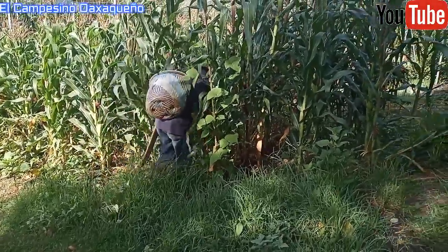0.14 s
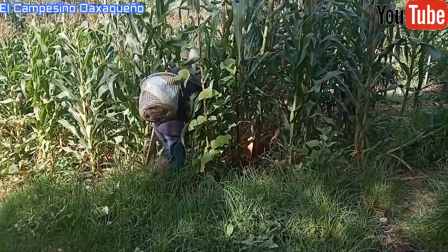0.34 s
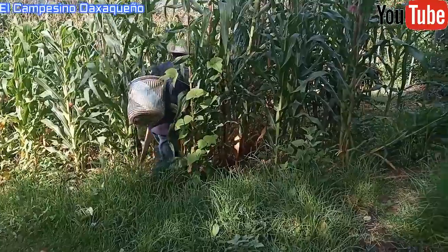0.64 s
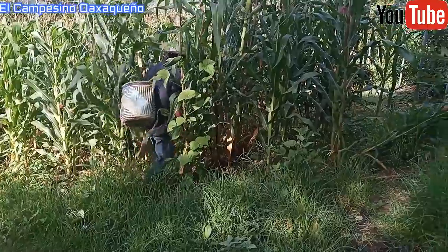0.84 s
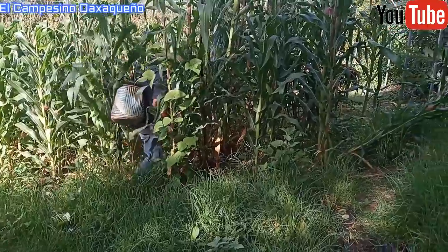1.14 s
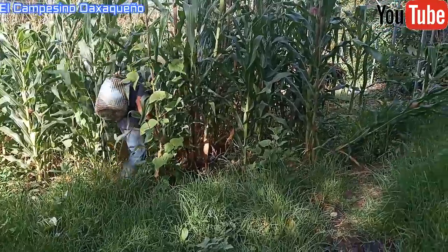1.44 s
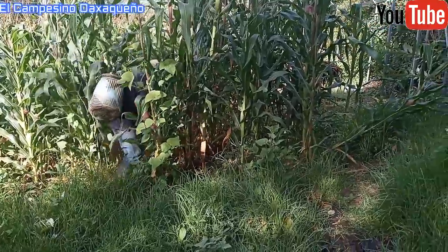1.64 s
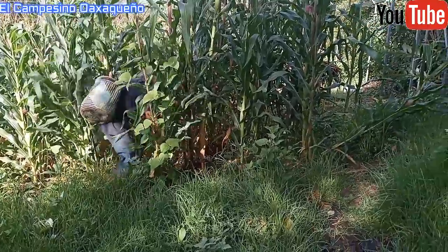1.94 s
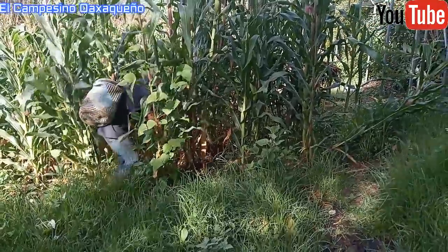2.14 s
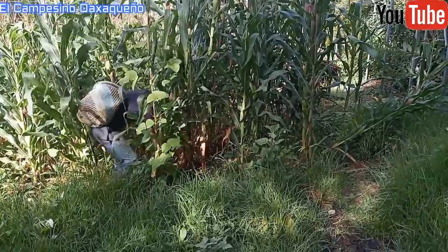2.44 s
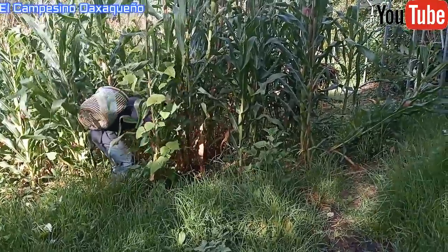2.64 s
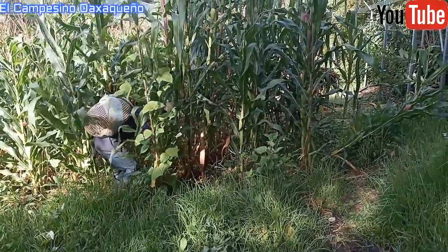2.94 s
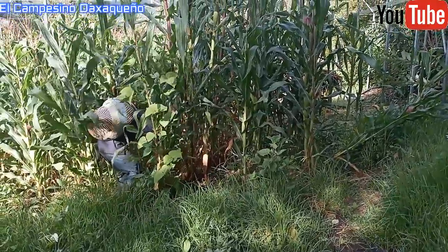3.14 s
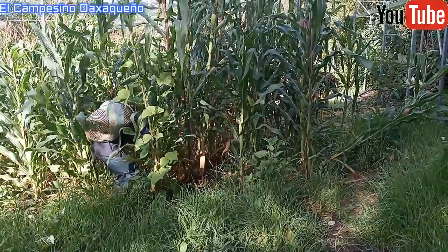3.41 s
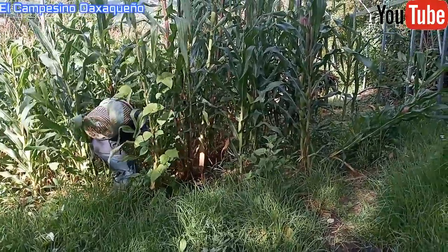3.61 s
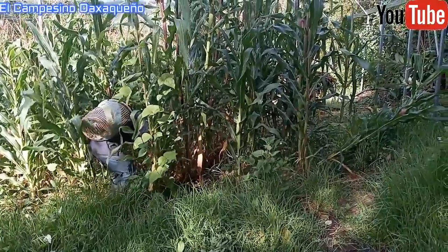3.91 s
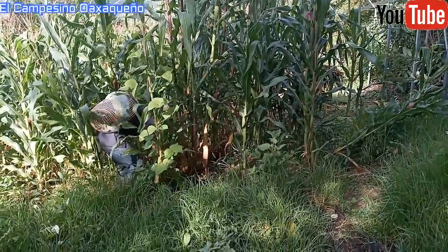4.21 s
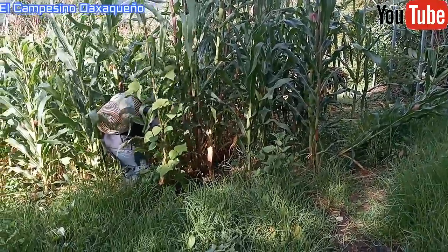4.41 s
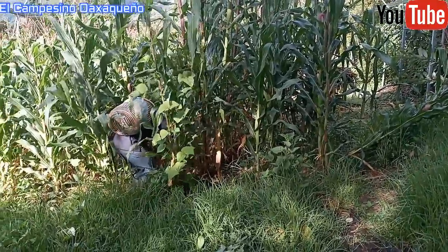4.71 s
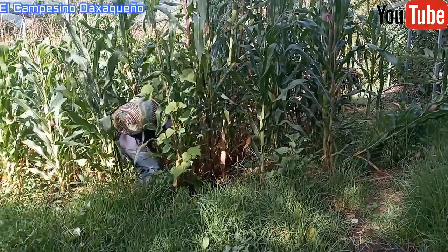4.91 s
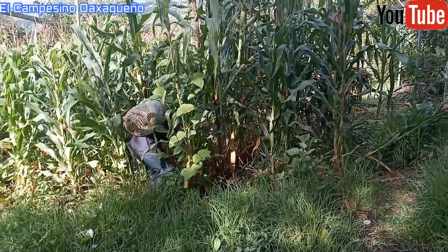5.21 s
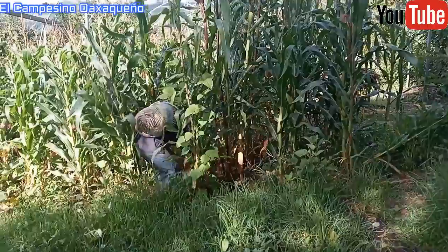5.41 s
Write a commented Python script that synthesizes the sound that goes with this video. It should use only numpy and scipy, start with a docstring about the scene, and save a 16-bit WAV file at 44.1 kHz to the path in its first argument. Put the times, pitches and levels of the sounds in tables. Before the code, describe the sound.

A person tears weeds from among tall plants: dense leafy crackle, brittle snapping stalks and soft thuds of soil. After almost three seconds the movement eases and a few faint chirps appear. About a second later comes another strong snap and rustle, while quick high chirps, louder toward the left, mix with low soft whistles. Quiet air and distant twitter run throughout, captured in stereo from a short distance.

```python
"""A stand of maize, heard from several metres away with a small stereo microphone.
Low open air and far-off twitter run throughout. Almost at once someone pushes in to tear out weeds:
leaves crackle in strokes of dense clicks, the soil thuds, and stems snap as bursts of ringing fibres.
The plants scatter every click. The rustle thins near three seconds, and small birds begin to chirp:
curving, nearly pure tones. Slower whistles join them about a second later, as the rustle returns."""
import sys
import numpy as np
from scipy import signal
from scipy.fft import rfft, irfft, next_fast_len
from scipy.io import wavfile

SR = 44100
rng = np.random.default_rng(int(sys.argv[2]) if len(sys.argv) > 2 else 0)


def transcribe(signal):
    """Save signal, clipped to [-1, 1], as a 16-bit WAV file at the path in sys.argv[1]."""
    frames = np.atleast_2d(signal).T
    limited = np.clip(frames, -1, 1)
    pcm = np.round(limited * 32767).astype(np.int16)
    wavfile.write(sys.argv[1], SR, pcm)


N = 245195
TIME = np.arange(N) / SR
PORT_LAG_S = .001  # direct sound reaches the left microphone port this much after the right


def undb(db):
    """Decibels to gain."""
    return 10 ** (np.asarray(db) / 20)


def unit(x):
    """Scale to an rms of one."""
    return x / np.sqrt(np.mean(x ** 2) + 1e-18)


def fade(t, t60):
    """A decay that loses 60 dB in t60 seconds, silent before time zero."""
    return (t >= 0) * np.exp(-np.log(1000) * np.abs(t) / t60)


def spectrum(points, hz):
    """Gain of (frequency [Hz], gain [dB]) points joined on a log-frequency axis."""
    knots, db = np.transpose(points)
    return undb(np.interp(np.log(hz + 1), np.log(knots), db))


def colour(x, response):
    """Filter by a gain that is given as a function of frequency."""
    size = next_fast_len(x.shape[-1] + 1024)
    gain = response(np.fft.rfftfreq(size, 1 / SR))
    return irfft(rfft(x, size) * gain, size)[..., :x.shape[-1]]


def resonance(hz, centre, q):
    """Gain of one damped resonance, one at its centre."""
    return 1 / np.sqrt(1 + (q * (hz / centre - centre / (hz + 1))) ** 2)


def delay(x, seconds):
    """The same sound, later."""
    shift = int(round(abs(seconds) * SR))
    return np.concatenate([np.zeros(shift), x])[:len(x)]


def walk(rate):
    """A random wander with a spread near one: straight lines between `rate` points per second."""
    return 1.2 * np.interp(TIME * rate, np.arange(2000), rng.standard_normal(2000))


def air(common=0.082):
    """Low outdoor rumble under a faint far hiss: coloured noise, partly alike at both ports."""
    # shape of the open air's noise: (frequency [Hz], gain [dB])
    air_shape = [(20, -13), (45, -7), (80, 4), (125, 2), (200, -0.5), (330, -3), (480, -7), (700, -6),
                 (1200, -11.5), (3000, -1), (5000, -22.5), (9000, -64)]
    noise = rng.standard_normal((2, N)) + common * rng.standard_normal(N)
    level_db = -58.5 + .7 * walk(9)
    return undb(level_db) * unit(colour(noise, lambda hz: spectrum(air_shape, hz)))


def field(song, t60=0.25):
    """A soft wash of echoes from the plants around, different at each port."""
    t = TIME[:SR // 2]
    echoes = rng.standard_normal((2, len(t))) * fade(t - .018, t60)
    echoes = unit(echoes) / np.sqrt(len(t))
    return signal.fftconvolve(song[None], echoes, axes=1)[:, :N]


def sing(notes, quaver=.003, flutter_db=2, softness=.35, waver=.008):
    """Nearly pure notes that curve in pitch and quaver a little; the higher the note, the more it buzzes."""
    song, flutter = np.zeros(N), undb(flutter_db * walk(120))
    fast, slow = waver * walk(330), quaver * walk(60)
    for s, length, first, middle, last, db in notes:
        on = (TIME >= s) & (TIME < s + length)
        u = (TIME[on] - s) / length  # 0 to 1 through the note
        unsteady = 1 + slow[on] + fast[on] * (middle / 3000) ** 6
        curve = np.polyfit([0, .5, 1], [first, middle, last], 2)
        hz = np.polyval(curve, u) * unsteady
        tone = np.sin(2 * np.pi * np.cumsum(hz) / SR)
        swell = np.abs(np.sin(np.pi * u)) ** softness
        song[on] += undb(db) * swell * flutter[on] * tone
    return song


def twitter(db=-57, pitch_hz=3080, range_hz=230, length=0.0327, count=36):
    """Far-off birds chirp at random and arrive only as echoes."""
    notes = []
    for when, *draws in rng.random((count, 4)):
        first_middle_last = pitch_hz + range_hz * (2 * np.array(draws) - 1)
        notes.append((when * N / SR, length, *first_middle_last, db))
    return field(sing(notes))


def bent(s, length, hz, shape, db):
    """A bird note whose shape bends it through a first, middle and last pitch."""
    # pitch shapes of bird notes: name: (first pitch [ratio to middle], last pitch [ratio to middle])
    bends = {"level": (1.02, .985), "sag": (1.055, .96), "fall": (1.085, .94), "drop": (1.02, .86),
             "plunge": (1.2, .72), "lift": (.93, 1.04), "rise": (.89, 1.11), "sweep": (.76, 1.16),
             "bow": (.89, .9), "arch": (.85, .82), "dip": (1.22, 1.27)}
    first, last = bends[shape]
    return s, length, hz * first, hz, hz * last, db


def birds(gain_db=-1, field_db=-4, whistle_field_db=-3.5):
    """Quick, buzzy chirps with one distinct echo and soft, wavering whistles, both in a wash from the field."""
    # quick high chirps: (time [s], length [s], middle pitch [Hz], shape, level before gain_db [dB])
    chirp_notes = [(3.043, 0.069, 2790, "lift", -55), (3.291, 0.031, 3060, "level", -46.5),
                   (3.365, 0.076, 3075, "level", -52.5), (3.491, 0.063, 3014, "level", -49.5),
                   (3.726, 0.048, 3060, "fall", -40.5), (3.753, 0.023, 3080, "lift", -36.5),
                   (3.947, 0.031, 3050, "rise", -38.5), (3.977, .04, 3330, "level", -42),
                   (4.005, 0.035, 2600, "lift", -43), (4.284, 0.025, 3750, "sag", -37),
                   (4.453, .026, 3250, "drop", -38), (4.468, 0.035, 3290, "bow", -41),
                   (4.51, 0.018, 3200, "level", -36), (4.598, 0.038, 3300, "level", -34.5),
                   (4.641, .028, 2700, "dip", -35.5), (4.674, 0.027, 3520, "level", -35.5),
                   (4.794, 0.043, 2850, "drop", -38), (4.83, 0.023, 2920, "rise", -35),
                   (4.869, .019, 3200, "sag", -43), (4.891, .03, 3080, "bow", -44),
                   (5.007, 0.048, 3216, "arch", -37), (5.052, 0.022, 3300, "sweep", -39.5),
                   (5.066, 0.04, 3260, "plunge", -37.5), (5.2, .049, 3110, "arch", -39.5),
                   (5.245, 0.025, 3080, "level", -41), (5.269, .04, 4090, "sag", -43.5),
                   (5.294, 0.049, 3950, "sag", -40)]
    # slow, lower whistles: (time [s], length [s], middle pitch [Hz], shape, level before gain_db [dB])
    whistle_notes = [(3.97, 0.13, 2115, "fall", -48.5), (4.362, 0.1, 1625, "rise", -48.5),
                     (4.365, 0.099, 2270, "bow", -46.5), (4.565, .135, 1690, "arch", -50),
                     (4.735, 0.098, 2126, "fall", -50), (5.04, 0.076, 2000, "sag", -48),
                     (5.124, 0.081, 1327, "sag", -55.5), (5.446, 0.17, 1457, "lift", -52)]
    pan_db = 6.5  # louder on the left than on the right
    echo_s, echo_db = .029, (-6.5, -15)  # from the edge of the field; (left, right)
    chirps = sing([bent(*note) for note in chirp_notes])
    whistles = sing([bent(*note) for note in whistle_notes], quaver=.007, flutter_db=2.5, softness=.55)
    song = chirps + whistles
    pan = undb(np.array([[pan_db], [-pan_db]]) / 2)
    direct = np.array([delay(song, PORT_LAG_S), song]) * pan
    echo = undb(echo_db)[:, None] * delay(chirps, echo_s)
    wash = field(undb(field_db) * chirps + undb(whistle_field_db) * whistles)
    return undb(gain_db) * (direct + echo + wash)


def soil(t60=0.79, q=1.6):
    """Dull, short rumbles as feet and roots shift the earth: fading noise around a low resonance."""
    # soft thuds on the soil: (time [s], level [dB], pitch [Hz])
    thuds = [(0.12, -54, 270), (1.249, -57.5, 364), (1.601, -60, 116), (3.925, -54.5, 133),
             (4.141, -55, 115.6), (4.58, -59.5, 170)]
    out = np.zeros((2, N))
    for s, db, pitch in thuds:
        rumble = colour(rng.standard_normal((2, N)), lambda hz: resonance(hz, pitch, q) ** 2)
        out += undb(db) * fade(TIME - s, t60) * unit(rumble)
    return out


def clicks(rate, spread_db, size):
    """Random tiny fractures, many small and a few large; sparse ones are raised to keep the power even."""
    share = np.clip(rate / SR, 1e-5, 1)  # chance of a click in each sample
    strength = undb(spread_db * np.minimum(rng.exponential(size=size), 4.5))
    struck = rng.random(size) < share
    sign = np.sign(rng.standard_normal(size))
    return unit(struck * sign * strength / np.sqrt(share))


def scatter(x, direct, t60, far_db, far_t60):
    """Each click reaches the right port first, then returns as a spray from near and far plants."""
    t = TIME[:SR // 2]
    near, far = fade(t, t60) ** 2, fade(t, far_t60) ** 2
    echoes = near / near.sum() + undb(far_db) ** 2 * far / far.sum()
    power = signal.fftconvolve(x ** 2, echoes / echoes.sum())[:len(x)]
    spray = np.sqrt(np.abs(power)) * rng.standard_normal((2, len(x)))
    arrivals = np.array([delay(x, PORT_LAG_S), x])
    return (direct * arrivals + spray) / np.hypot(1, direct)


def registers(x, shape, low_hz=1500, high_hz=9200):
    """Colour clicks and part them into low, main and crisp top registers, each at unit gain."""
    def part(hz):
        low = 1 / (1 + (hz / low_hz) ** 8)
        top = 1 / (1 + (high_hz / (hz + 1)) ** 12)
        return np.array([unit(shape(hz) * share) for share in (low, 1 - low - top, top)])[:, None]
    return colour(x, part)


def stems(fibre_rate=5500, ring_q=5.4):
    """A stem starts to give, then fails in a quick run of breaking fibres that ring its hollow stalk."""
    # stems breaking: (time [s], time to give way, as a 60 dB rise [s], level [dB], ring pitch [Hz],
    # ring strength [dB], low knock relative to crack [dB], crispness relative to crack [dB])
    snaps = [(0.208, .03, -40.5, 4330, -12, -43, 0.5), (1.097, .005, -34, 3200, 11, -27, -7),
             (1.249, .006, -26.5, 3380, -15, -17, -25), (1.409, 0.026, -22, 8100, 6.5, -48, -5.5),
             (1.5624, 0.003, -26.5, 3980, -2, -20, -26), (1.607, 0.013, -30.5, 7700, 1, -42, -3.5),
             (1.891, 0.0037, -36, 4400, -7, -21, -16), (2.421, 0.035, -35.5, 3000, 13, -44, -18),
             (2.588, 0.003, -45, 1840, 22, -18, -22), (2.601, .003, -36, 1520, 23, -14, -18),
             (2.731, 0.039, -40.5, 2960, -2, -16, -15), (2.991, 0.0065, -43, 9000, 15, -18, -24),
             (3.0036, 0.0022, -35, 3400, 6, -31, -22), (3.012, 0.0044, -38, 2470, 13, -35, -22),
             (3.722, 0.0032, -47.5, 3640, 15, -40, -15), (3.9174, 0.0043, -29.5, 1750, 8, -28, 2),
             (3.921, .003, -33, 7800, 12, -40, -11), (4.1269, 0.0081, -25.5, 1860, 7, -10.5, -8),
             (4.261, .006, -35.5, 1920, 35, -19, -7), (4.749, 0.0037, -35, 2480, 22, -28, -13),
             (4.858, 0.0088, -32, 2750, 10, -13, -5)]
    # shape of breaking stems: (frequency [Hz], gain [dB])
    stem_shape = [(200, -9.5), (520, -18.5), (800, 3.5), (1000, -3.5), (2000, -0.5), (3500, 11), (5000, 5),
                  (6500, 6.5), (8200, 1), (9800, -10.5), (13600, -15.5), (15500, -12.5)]
    size, lead = SR // 3, .01  # samples per snap; seconds kept ahead of the break
    out, t = np.zeros((2, N + size)), TIME[:size] - lead
    for s, onset_s, db, ring_hz, ring_db, low_db, top_db in snaps:
        # thinner, higher stems part sooner
        tear_t60 = 2 * .017 * (3300 / ring_hz) ** .13
        envelope = np.maximum(fade(t, tear_t60), fade(-t, onset_s))
        fibres = clicks(fibre_rate, 0.37, size) * envelope
        fibres *= np.sqrt(.01 * SR / np.sum(fibres ** 2))  # same energy for every snap
        heard = scatter(fibres, direct=0.67, t60=0.026, far_db=-2.5, far_t60=0.18)

        def stalk(hz):
            ring = undb(ring_db) * resonance(hz, ring_hz, ring_q) ** 2
            return spectrum(stem_shape, hz) * (1 + ring)
        knock, crack, crisp = registers(heard, stalk)
        start = int((s - lead) * SR)
        snap = undb(low_db) * knock + crack + undb(top_db) * crisp
        out[:, start:start + size] += undb(db) * snap
    return out[:, :N]


def push(flap_wander_db=3.5):
    """Level of the rustle and its shares of flap and crispness, in dB: every stroke swells, holds and settles."""
    # strokes of body and hands through the leaves: (time [s], hold [s], level [dB],
    # low flapping relative to scrape, before its wander [dB], dry crispness relative to scrape [dB])
    strokes = [(0.1, 0.12, -42, -22.5, -8.5), (0.306, 0.085, -37.5, -18, -10.5),
               (0.595, 0.11, -40.5, -18, -9), (0.769, 0.074, -37.5, -16, -12),
               (1.025, 0.1, -37.5, -14, -9.5), (1.221, 0.096, -35, -14.5, -12), (1.241, 0.026, -47, 6, -16),
               (1.413, 0.19, -39, -19.5, -9), (1.743, 0.098, -38.5, -18, -10),
               (1.915, 0.083, -36, -17.5, -12.5), (2.036, 0.065, -38.5, -18.5, -11),
               (2.183, 0.062, -39, -21.5, -13), (2.39, 0.093, -38.5, -19.5, -9),
               (2.524, 0.034, -40.5, -22, -5.5), (2.676, 0.15, -46.5, -22, -15.5),
               (2.897, 0.1, -49.5, -26.5, -9), (3.076, 0.0073, -49.5, -19, -10),
               (3.228, 0.015, -48.5, -14, -16), (3.412, 0.12, -51, -19, -13),
               (3.632, 0.21, -56.5, -12, -13.5), (3.907, 0.035, -46, -14.5, -5),
               (4.15, 0.059, -42.5, -13, -5.5), (4.213, 0.058, -35.5, -18, -12.5),
               (4.519, 0.11, -42, -25.5, -9), (4.73, 0.029, -46.5, -21, -20),
               (4.916, 0.084, -40, -21.5, -7.5), (5.077, 0.023, -42.5, -31, -6),
               (5.314, 0.096, -47, -34, -13), (5.466, 0.12, -44, -24.5, -4)]
    # faint stirring between strokes: level [dB], flapping and crispness relative to scrape [dB]
    rest = (-74, -29, -24)
    # a stroke builds by swell_db in a time as long as its hold: slow strokes swell slowly
    # a curve above one builds fast at first, then levels off
    swell_db, swell_curve = 8.5, 1.73
    settle_db_per_s = 112.5  # the leaves come to rest after each stroke
    t = TIME[::64]

    def powers(db, flap_db, crisp_db):
        return undb([[0], [flap_db], [crisp_db]]) ** 2 * undb(np.maximum(db, -200)) ** 2
    total = powers(*rest)
    for s, hold, db, flap_db, crisp_db in strokes:
        swell = swell_db * (np.maximum(s - t, 0) / hold) ** swell_curve
        settle = settle_db_per_s * np.maximum(t - s - hold, 0)
        total = total + powers(db - swell - settle, flap_db, crisp_db)
    scrape, flap, crisp = (np.interp(TIME, t, level) for level in 10 * np.log10(total))
    # the low flapping never stops; its level wanders at random
    return scrape, flap - scrape + flap_wander_db * walk(21.88), crisp - scrape


def leaves(rate=1600, spread_db=2.5, own_db=-2, blade_q=8, flare_db=1.5, jerk_db=1.08, flap_db=1):
    """Rough leaf edges catch and slip; harder pushing makes the clicks denser and louder."""
    # shape of rubbing leaves: (frequency [Hz], gain [dB])
    leaf_shape = [(150, -28), (450, -27.5), (620, -23.5), (800, -20), (1030, -22), (1330, -15.5),
                  (1780, -1.5), (2900, 5), (4300, 3.5), (5000, -1.5), (6800, 2.5), (8200, -2.5),
                  (9800, -16.5), (11500, -15), (13600, -23.5), (15300, -18.5)]
    db, low_db, top_db = push()
    density = rate * undb(0.84 * (db + 43.5))  # clicks per second

    def patch(share):
        return scatter(clicks(density * share, spread_db, N), direct=0.37, t60=0.019, far_db=3.5, far_t60=0.085)
    # broad clicks, plus single blades whose levels each wander around their own pitch
    blades = np.zeros((2, N))
    for centre in np.geomspace(650, 13000, num=22):
        blade = colour(patch(.25), lambda hz: resonance(hz, centre, blade_q) ** 2)
        blades += blade * undb(flare_db * walk(55))
    crackle = unit(unit(patch(1.0)) + undb(own_db) * unit(blades))
    crackle = crackle * undb(jerk_db * walk(45))
    flap, scrape, crisp = registers(crackle, lambda hz: spectrum(leaf_shape, hz))
    return undb(db) * (undb(flap_db + low_db) * flap + scrape + undb(top_db) * crisp)


def scene():
    """Everything that sounds in the field, from the background to the leaves."""
    return air() + twitter() + birds() + soil() + stems() + leaves()


def record(dry):
    """The microphone ports share each frequency unevenly between left and right; the top is cut."""
    # balance of the two ports: (frequency [Hz], left minus right [dB])
    port_balance = [(60, 2.5), (700, 3), (1300, 1.5), (2400, -1), (3700, -4), (5200, 0), (6800, 11),
                    (8200, 38), (9500, 3.5), (11400, -2.5), (13000, -16), (15500, 13)]

    def ports(hz):
        ratio = spectrum(port_balance, hz)
        return np.array([ratio, np.ones_like(ratio)]) * np.sqrt(2 / (1 + ratio ** 2))
    top_cut = signal.ellip(10, .2, 80, 15900, fs=SR, output="sos")  # order, ripple dB, stop dB, Hz
    return signal.sosfilt(top_cut, colour(dry, ports))


dry = scene()
out = record(dry)
transcribe(out)
```